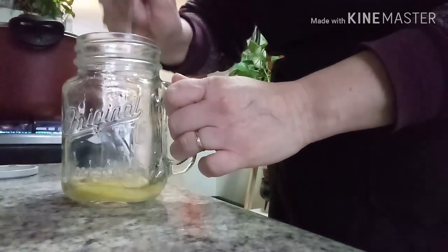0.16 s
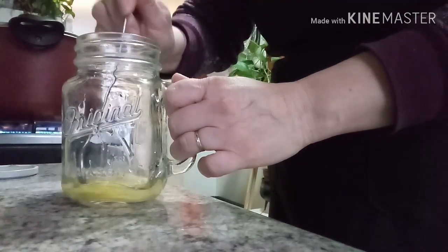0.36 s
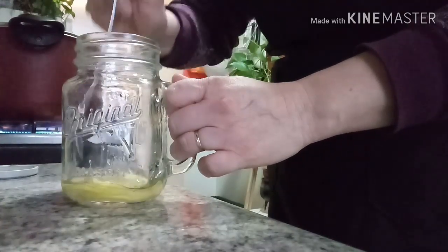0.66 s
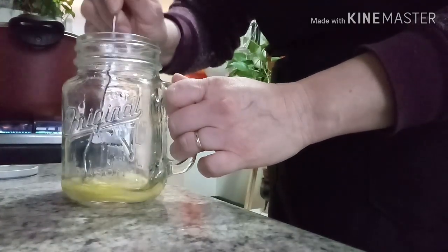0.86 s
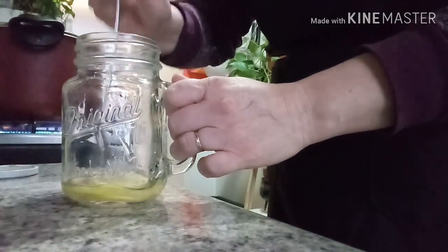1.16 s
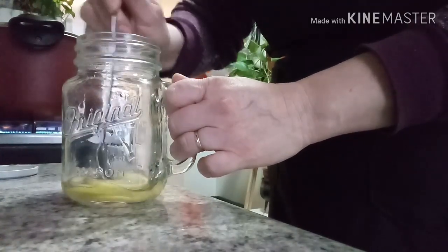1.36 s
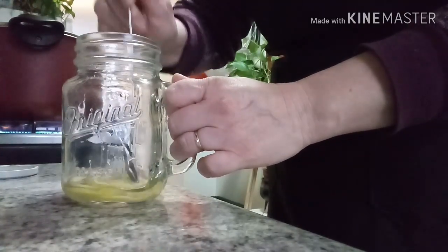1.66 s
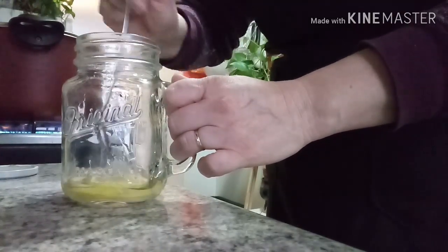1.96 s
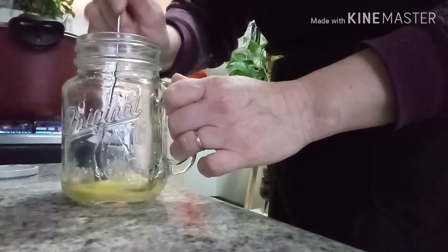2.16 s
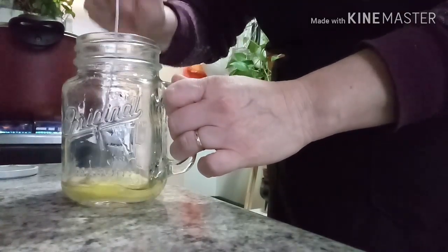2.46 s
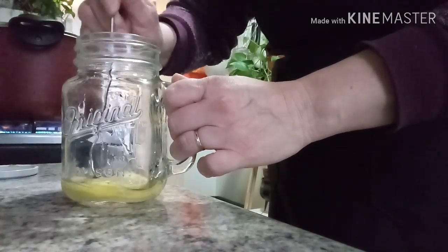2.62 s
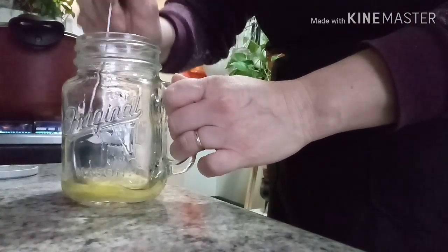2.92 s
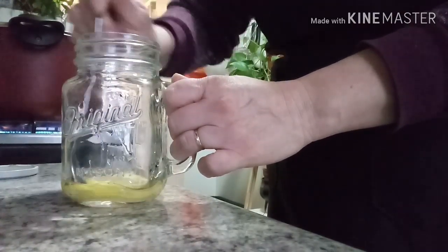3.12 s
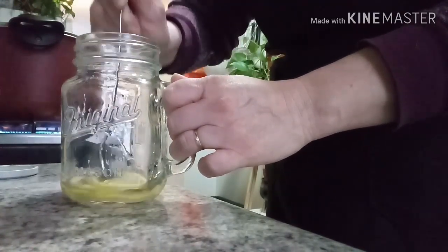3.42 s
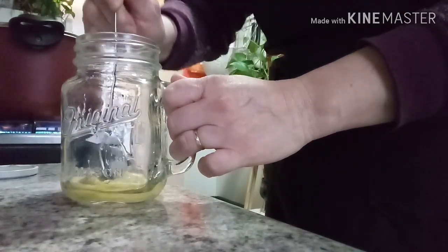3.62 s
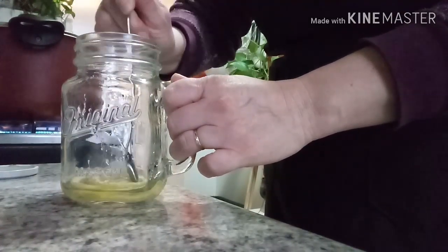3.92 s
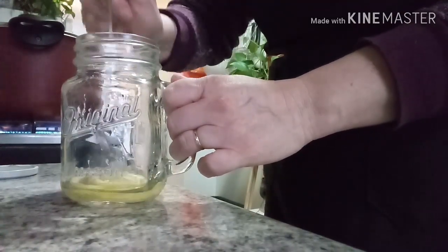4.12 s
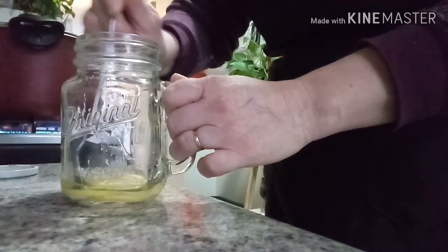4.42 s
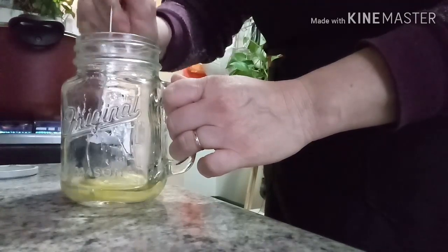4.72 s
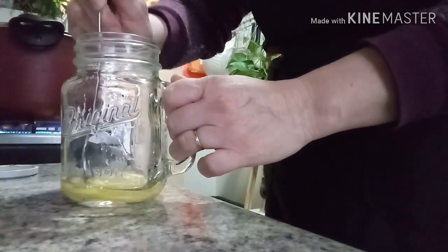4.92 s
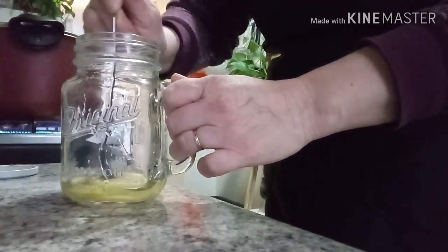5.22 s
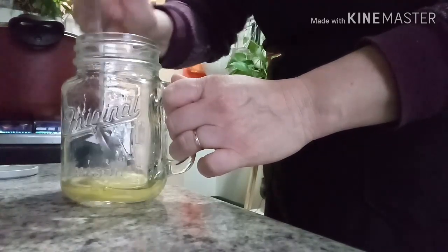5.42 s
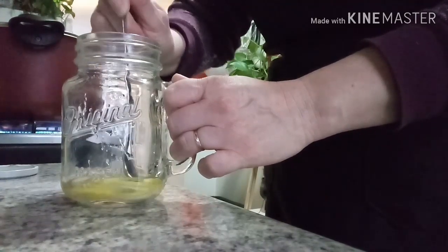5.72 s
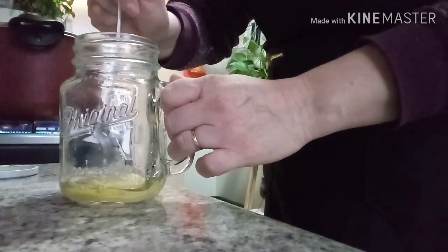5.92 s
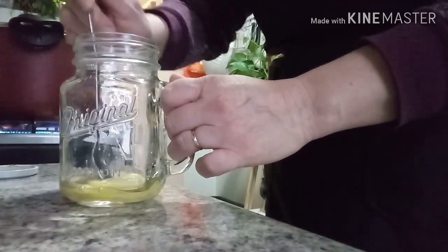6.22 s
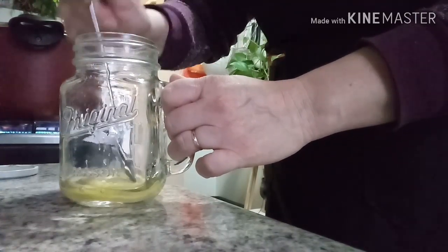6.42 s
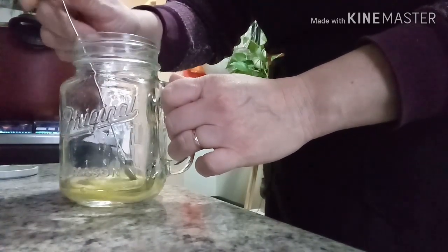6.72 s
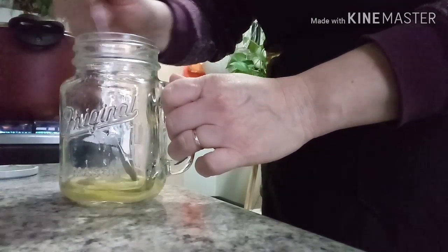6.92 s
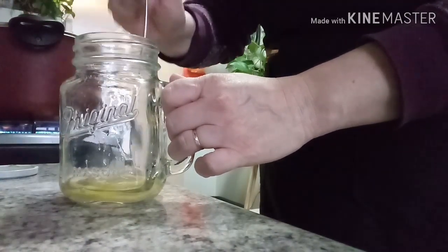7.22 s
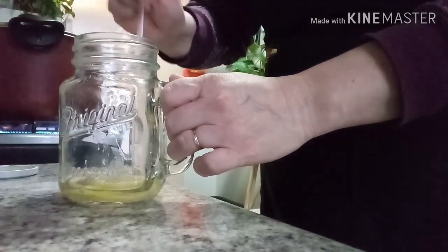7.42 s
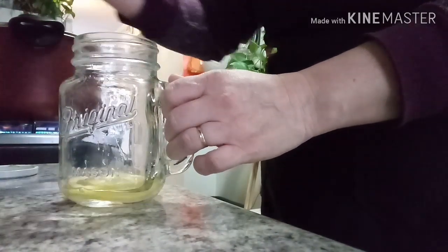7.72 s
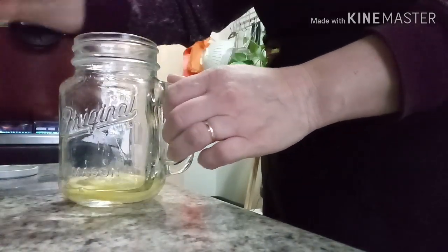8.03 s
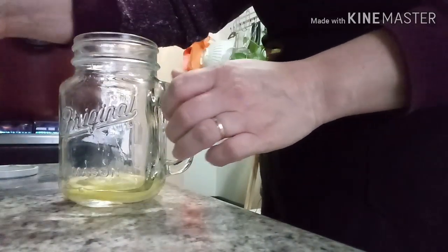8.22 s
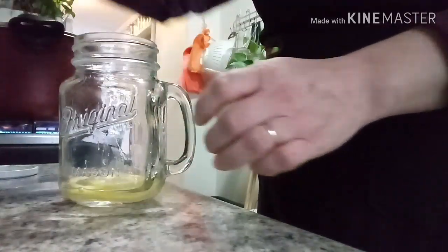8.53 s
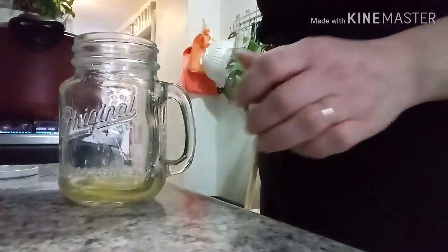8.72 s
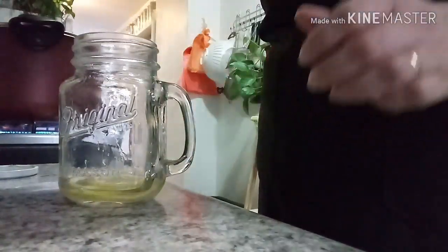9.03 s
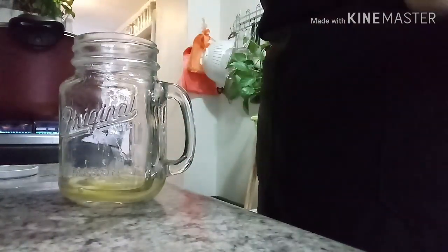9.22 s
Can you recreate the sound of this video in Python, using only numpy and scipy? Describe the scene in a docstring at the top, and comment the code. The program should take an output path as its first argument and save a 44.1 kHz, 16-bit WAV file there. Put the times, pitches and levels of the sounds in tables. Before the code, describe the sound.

Close to the microphone on a stone counter, a heavy glass mug is bumped softly as a spoon stirs a little liquid. Low thuds and dull knocks come about twice a second, with hardly any ringing at first. Near the end the spoon strikes the glass brightly, chatters on the rim, and is laid down further off with a short rustle. A faint gas burner roars and hisses behind in a small hard kitchen.

```python
"""Stirring juice in a glass jar mug

A spoon stirs a little juice in a jar mug held on a stone counter, close to a phone lying on that counter.
The jar's foot thuds (sagging sines) and knocks (counter modes, filtered grit); the spoon clinks the wall
and rim (glass modes), then is laid down further off with a rustle (patchy noise).
Behind, filtered noise makes a gas burner's roar and hiss; decaying noise is the small hard kitchen's answer."""
import sys
import numpy as np
from scipy import signal
from scipy.fft import rfft, irfft, next_fast_len
from scipy.io import wavfile
from scipy.ndimage import uniform_filter1d, map_coordinates

SR = 44100
rng = np.random.default_rng(int(sys.argv[2]) if len(sys.argv) > 2 else 0)


def waveform_to_disk(signal):
    """Save audio, clipped to [-1, 1], as 16-bit WAV at the path in sys.argv[1]."""
    frames = np.transpose(np.atleast_2d(signal))
    scaled = np.clip(frames, -1, 1) * 32767
    samples = np.round(scaled).astype(np.int16)
    wavfile.write(sys.argv[1], SR, samples)


N = 413216

# background course: (time [s], flame roar before its 4 dB lift [dB], gas hiss [dB], scrape of the jar's foot [dB])
BACKGROUND_LEVELS = [(0.0, -50.5, -65, -61), (0.6, -56, -68.5, -63.5), (1.62, -53, -69.5, -67.5),
                     (2.11, -57, -70.5, -56.5), (2.5, -54.5, -71, -68), (3.23, -55.5, -64.5, -62.5),
                     (3.7, -55.5, -70.5, -69), (4.33, -52, -76, -68), (4.7, -58, -68, -66.5),
                     (4.91, -55, -70, -67.5), (6.97, -53.5, -67, -63), (7.25, -55, -70, -61),
                     (7.49, -54, -65.5, -62.5), (8.01, -59.5, -74, -68.5), (8.35, -49.5, -62, -53),
                     (8.51, -59.5, -68, -60), (8.92, -52, -68, -65.5), (9.37, -58.5, -70.5, -70.5)]
# soft pushes of the jar on the counter: (time [s], level [dB], t60 [s], level of the rumble that follows [dB])
PUSHES = [(0.041, -38, 0.11, -45), (0.114, -22.5, 0.088, -52), (0.197, -27.5, 0.16, -53),
          (0.483, -38, 0.22, -49), (0.575, -29, 0.073, -52), (0.952, -11.5, 0.079, -47.5),
          (1.396, -14.5, 0.042, -44.5), (1.78, -42, 0.11, -45), (1.833, -25.5, 0.065, -53),
          (1.888, -30, 0.35, -57), (1.967, -24, 0.11, -56), (2.295, -15, 0.056, -38),
          (2.684, -28.5, 0.21, -52), (2.735, -22, 0.091, -60.5), (3.11, -15.5, 0.047, -47),
          (3.242, -29.5, 0.075, -60), (3.56, -40, 0.11, -51.5), (3.965, -27.5, 0.18, -45.5),
          (4.101, -39, 0.11, -58), (4.411, -28, 0.15, -45), (4.914, -26, 0.099, -44),
          (5.314, -28, .12, -40), (5.356, -28, 0.061, -54), (5.497, -29.5, 0.057, -65.5),
          (5.744, -25.5, 0.084, -43), (5.908, -33, 0.067, -48), (6.167, -35, 0.31, -45),
          (6.635, -34.5, 0.099, -55), (7.391, -13.5, 0.07, -56), (8.252, -43, 0.095, -62),
          (8.841, -47, .1, -47), (8.921, -31.5, 0.16, -61), (9.02, -55, .1, -55.5)]
# the jar's foot or the spoon meeting something hard and dull: (time [s], counter level near 500 Hz [dB],
# then relative to that: counter at 200 Hz [dB], counter at 1 kHz [dB], click [dB], snap [dB])
CONTACTS = [(0.127, -45.5, -7, -19, -10.5, -17), (0.202, -26.5, -2, -5, -5.5, -45),
            (0.534, -34, -17.5, -39, -26, -49), (0.556, -45.5, -16.5, -5.5, -13, -25),
            (0.582, -32.5, -19, -8, 3.5, -21), (0.961, -17.5, -10.5, -6, -2.5, -11),
            (1.239, -55, -3, -9, -27, -25), (1.405, -43, 2.5, -37, -37, -51.5),
            (1.888, -36, 4.5, -14, -27, -21.5), (1.971, -24, -2, -4.5, -2, -30),
            (2.285, -48.5, 13, -20, -14, -31), (2.294, -46.5, 12.5, -4, -18, -23.5),
            (2.69, -45.5, -4, -24.5, -15, -31.5), (2.714, -43, 0, -7, -32, -23),
            (2.737, -24.5, -12.5, -3, -4.5, -10.5), (3.116, -33.5, 0, -7.5, -2, -31),
            (3.245, -39.5, -19, -6, -11, -31.5), (3.255, -37, -9, -12, -8, -41),
            (4.467, -50, 1.5, -9, 6, -11), (4.509, -49.5, -18, -32.5, -23, -17),
            (4.614, -62, -7.5, -10, 2, -2.5), (4.922, -19, -10, -3.5, -1, -8.5),
            (5.764, -57, 4, -19, -25, -30), (5.911, -28, 0, -1.5, -3.5, -40),
            (6.633, -27, -1.5, -1, -0.5, -2), (6.884, -71, 1, -17, -1, -29), (7.39, -32, 10, -1, 5, -2.5),
            (7.4, -20, -0.5, -7, -13, -25), (8.22, -32.5, -12.5, -4.5, -4, -1),
            (8.23, -36, -15.5, -2, -12, -11.5), (8.329, -46, -12, 8.5, -30, -13),
            (8.367, -40, -15, -12, -29, -6)]


def amp(db):
    """dB to gain."""
    return 10 ** (np.asarray(db) / 20)


def unit(x):
    """Scaled to rms 1."""
    return x / np.sqrt(np.mean(x ** 2) + 1e-20)


def along(points, hz):
    """Reads (Hz, value) points on a log frequency axis."""
    f, v = np.transpose(points)
    return np.interp(np.log(hz + 1), np.log(f + 1), v)


def curves(rows):
    """One value per sample for each column after the time."""
    s, *columns = np.transpose(rows)
    return [np.interp(np.arange(N) / SR, s, column) for column in columns]


def filtered(x, response):
    """x times a complex response of frequency."""
    m = next_fast_len(N + SR // 2)
    return irfft(rfft(x, m) * response(np.fft.rfftfreq(m, 1 / SR)), m)[..., :N]


def resonances(modes):
    """Causal response of (Hz, width Hz, dB) resonances, summed with alternating sign."""
    def response(f):
        return sum((-1) ** k * amp(db) * 1j * f * width / (hz * hz - f * f + 1j * f * width)
                   for k, (hz, width, db) in enumerate(modes))
    return response


def shaped(spectrum):
    """Response of a (Hz, dB) spectrum."""
    return lambda hz: amp(along(spectrum, hz))


def rush(response, patchy_db):
    """Coloured noise of rms 1 whose gain wanders in thin streaks, a bin or two wide and about .1 s long."""
    z = signal.stft(rng.standard_normal(N), nperseg=512)[2]
    field = uniform_filter1d(rng.standard_normal(z.shape), size=2, axis=0)
    field = uniform_filter1d(field, size=14, axis=1)
    patchy = signal.istft(z * amp(patchy_db * unit(field)), nperseg=512)[1][:N]
    return unit(filtered(patchy, response))


def ringing(modes, gains_db, attack, drift):
    """Half a second of decaying modes that start together and wander apart in phase."""
    hz, _, t60 = np.transpose(modes)[:, :, None]
    t = np.arange(SR // 2) / SR
    steps = np.cumsum(rng.standard_normal((len(hz), 201)), axis=1)
    wander = np.array([np.interp(t, np.linspace(0, .5, 201), row - row[0]) for row in steps])
    swing = np.sin(2 * np.pi * hz * t + drift * wander)
    return np.sum(amp(gains_db[:, None] - 60 * t / t60) * swing, axis=0) * (1 - np.exp(-t / attack))


def add(track, s, sound):
    """Lays a sound on the track at time s."""
    part = track[max(round(s * SR), 0):][:len(sound)]
    part += sound[:len(part)]


def wobble(rate):
    """A smooth random curve, rate knots a second."""
    return map_coordinates(rng.standard_normal(int(N * rate / SR) + 4), [np.arange(N) * rate / SR])


def wake(times, levels_db, rise, t60):
    """Gain that swells after each contact and dies away."""
    out, t = np.zeros(N), np.arange(SR // 2) / SR
    for s, db in zip(times, levels_db):
        add(out, s, amp(db - 60 * t / t60) * (1 - np.exp(-t / rise)))
    return out


def strokes(times, lengths, levels_db, edge):
    """Gain that rises at each contact, sinks over its length and then falls nearly to nothing."""
    t = np.arange(N) / SR
    shape = [0.0032, 0.65, 0.11, 0.00067]
    return sum(amp(db) * np.interp(t, [s, s + edge, s + edge + length, s + 3 * edge + length], shape)
               for s, length, db in np.broadcast(times, lengths, levels_db))


def room_tone():
    """Steady coloured noise: the room's air and the microphone's self-noise."""
    # (frequency [Hz], relative density [dB per Hz])
    air_colour = [(410, -16.5), (700, 0.5), (876, -5), (1590, -12.5), (2100, -8.5), (2560, -15.5),
                  (3000, -12), (4640, -20), (5580, -12.5), (6370, -14), (8080, -24.5), (13500, -29),
                  (15000, -21), (15800, -26), (16500, -44.5)]
    air_db = -73.5
    return amp(air_db) * rush(shaped(air_colour), patchy_db=2.5)


def burner():
    """Gas burner behind: the flame's low resonances colour a roar, the gas jets a hiss; both are noise."""
    # the flame's resonances, before the power that steepens them: (frequency [Hz], width [Hz], level [dB])
    flame_modes = [(100, 41, -12), (129.9, 16, -4.5), (146.16, 14, -3), (181.2, 44, -13.5)]
    # gas jets: (frequency [Hz], relative density [dB per Hz])
    jet_colour = [(2240, -42.5), (3800, -16), (4120, -16), (4680, -10.5), (4790, -16), (5230, -4.5),
                  (5600, -1.5), (6360, 3), (7500, -20), (8500, -48.5), (11000, -67.5), (18700, -120)]
    # the roar drops out briefly: (time [s], change [dB])
    roar_dips = [(.4, -16), (.76, -5), (2.85, -8), (4.61, -8), (6.8, -18), (7.57, -30), (8.58, -27),
                 (9.06, -9)]
    dip_s = .035
    t = np.arange(N) / SR
    roar_db, hiss_db, _ = curves(BACKGROUND_LEVELS)
    dips_db = sum(db * np.exp(-((t - s) / dip_s) ** 2) for s, db in roar_dips)
    roar_db = roar_db + dips_db + 1.7 * wobble(6)
    roar = amp(roar_db + 4) * rush(lambda f: resonances(flame_modes)(f) ** 1.694, patchy_db=1.5)
    hiss = amp(hiss_db + 1.4 * wobble(5.5)) * rush(shaped(jet_colour), patchy_db=5.0)
    return roar + hiss


def counter_rumble():
    """Each push leaves a low rumble in the counter, noise over a faint constant floor."""
    # (frequency [Hz], relative density [dB per Hz])
    rumble_colour = [(12, -22), (25, 5), (50, 4), (80, -6), (110, -21.5), (200, -65)]
    floor_db, edge_s, hold_s = -77.5, .03, 0.14
    push_s, _, _, after_db = np.transpose(PUSHES)
    gain = amp(floor_db) + strokes(push_s, hold_s, after_db, edge_s)
    return gain * rush(shaped(rumble_colour), patchy_db=3.5)


def rubbing():
    """The jar's foot scrapes the stone and the spoon drags: noise that swells after knocks and in short rubs."""
    # the jar's foot on stone: (frequency [Hz], relative density [dB per Hz])
    scrape_colour = [(110, -53.5), (190, -12.5), (226, -10), (259, -7.5), (400, -8), (532, -19), (719, -35),
                     (855, -32.5), (932, -26), (1500, -44.5), (1950, -72), (3300, -120)]
    # what the dragged spoon excites: (frequency [Hz], width [Hz], relative level [dB])
    drag_modes = [(1007, 300, -4.5), (2282, 53, 0), (2640, 170, 2), (2930, 190, 3.5), (3355, 180, -2.5),
                  (4495, 170, -3.5), (4900, 200, -5.5)]
    # short rubs along the stone or the glass: (time [s], length [s], scrape level [dB], drag level [dB])
    rub_rows = [(0.502, 0.22, -58, -96), (1.86, 0.16, -63, -75), (3.288, .16, -64, -65),
                (4.447, 0.1, -58, -72), (4.61, 0.039, -78, -70), (6.86, 0.063, -57, -75),
                (7.498, 0.38, -62, -69.5), (8.324, 0.18, -81, -53), (8.842, 0.15, -57.5, -66.5)]
    drag_floor_db, rub_edge_s = -83, .02
    scrape_after_db, scrape_t60 = -31, 0.13  # relative to the knock; s
    drag_after_db, drag_t60 = -20.5, 0.2  # relative to the knock's click; s
    scrape_db = curves(BACKGROUND_LEVELS)[2]
    knock_s, knock_db, _, _, click_db, _ = np.transpose(CONTACTS)
    rub_s, rub_length, rub_scrape_db, rub_drag_db = np.transpose(rub_rows)

    scrape = amp(scrape_db + 2.0 * wobble(8))
    scrape += wake(knock_s, knock_db + scrape_after_db, 0.017, scrape_t60)
    scrape += strokes(rub_s, rub_length, rub_scrape_db, rub_edge_s)
    drag = amp(drag_floor_db + 2.3 * wobble(8))
    drag += wake(knock_s, knock_db + click_db + drag_after_db, 0.0062, drag_t60)
    drag += strokes(rub_s, rub_length, rub_drag_db, rub_edge_s)
    return scrape * rush(shaped(scrape_colour), patchy_db=2.5) + drag * rush(resonances(drag_modes), patchy_db=8.5)


def kitchen(x):
    """Each frequency of the room's answer dies at its own speed; a new noise tail for each quarter second."""
    # (frequency [Hz], t60 [s])
    room_decay = [(200, 0.42), (1000, 0.21), (4000, 0.32), (10000, 0.097)]
    out, step = np.zeros(N), SR // 4
    for start in range(0, N, step):
        hz, t, z = signal.stft(rng.standard_normal(SR // 2), SR, nperseg=256)
        fade = amp(-60 * t / along(room_decay, hz)[:, None])
        tail = signal.istft(z * fade, SR, nperseg=256)[1]
        answer = signal.fftconvolve(x[start:start + step], tail / np.linalg.norm(tail))
        add(out, start / SR + 0.0036, answer)  # arrives 3.6 ms late
    return out


def faint_tones():
    """Lone faint wavering sines with a soft start, scattered through the background."""
    # (time [s], level [dB], frequency [Hz], t60 [s])
    tone_rows = [(0.03, -66.5, 2040, 0.3), (0.129, -64.5, 2720, 0.62), (0.585, -53, 4900, 0.14),
                 (0.6, -64, 2710, .14), (1.651, -53, 2870, 0.15), (1.89, -62.5, 2690, .24),
                 (2.08, -62, 964, 1), (2.08, -66, 2780, 0.22), (2.534, -60, 2570, 0.25),
                 (2.82, -66, 2756, 0.39), (3.12, -43, 4930, 0.07), (3.33, -72, 2113, .5),
                 (4.0, -61, 4000, 0.17), (4.472, -62.5, 2640, .21), (4.62, -64, 4600, 0.28),
                 (4.62, -69, 3430, 0.21), (4.96, -60, 410, 1), (5.02, -60.5, 2100, 0.57),
                 (6.75, -61, 2080, .21), (7.229, -64, 2870, 0.19), (7.541, -51.5, 2890, .2),
                 (8.83, -38.5, 972, 0.056), (8.931, -61, 1184, 0.56), (8.97, -68, 4550, .36),
                 (9.0, -66, 2230, .33)]
    out = np.zeros(N)
    for s, db, hz, t60 in tone_rows:
        add(out, s, ringing([(hz, db, t60)], np.array([db]), attack=.006, drift=0.58))
    return out


def rustle():
    """The spoon is laid down: a brief patchy noise that fades, with two dry ticks as bursts of its gain."""
    # (time [s], level [dB])
    swell_rows = [(8.828, -47), (8.864, -51), (8.868, -54.5), (8.924, -51.5), (8.966, -66.5), (9.064, -66),
                  (9.15, -87)]
    # (frequency [Hz], relative density [dB per Hz])
    colour = [(470, -57.5), (800, -42), (964, -8.5), (1490, -29), (1720, -5), (1950, -38.5), (2180, 2.5),
              (2770, -2), (5780, -1.5), (9500, -38), (12400, -78.5), (20900, -120)]
    # (time [s], level before the soft attack [dB])
    tick_rows = [(8.8265, -26), (8.8707, -29)]
    t = np.arange(N) / SR
    first_s, last_s = swell_rows[0][0], swell_rows[-1][0]
    inside = np.interp(t, [first_s - .002, first_s, last_s, last_s + .01], [0, 1, 1, 0])
    swell = inside * amp(curves(swell_rows)[0])
    tick_t = t[:SR // 20]
    for s, db in tick_rows:
        add(swell, s, amp(db - 60 * tick_t / 0.0083) * (1 - np.exp(-tick_t / 0.0013)))
    return swell * rush(shaped(colour), patchy_db=2)


def thuds():
    """A soft push swells over a few ms and swings the counter for a few cycles, the pitch sagging."""
    pitch_hz, spread_hz = 92, 2.4  # each swing starts at about 1.35 times its drawn pitch and sags to 0.41 times
    rock_s, rock_db, rock_t60 = .045, -17, 0.067  # the jar rocks back once: delay s, level re the push, s
    out, t = np.zeros(N), np.arange(SR // 3) / SR
    swings = []
    for s, db, t60, _ in PUSHES:
        swings += [(s, db, t60), (s + rock_s, db + rock_db, rock_t60)]
    sag = 0.41 * t + .75 * .03 * (1 - np.exp(-t / 0.024))
    for s, db, t60 in swings:
        turns = rng.normal(pitch_hz, spread_hz) * sag + rng.random()
        swell = (1 - np.exp(-t / 0.0026)) ** 2
        add(out, s, amp(db - 60 * t / t60) * swell * np.sin(2 * np.pi * turns))
    return out


def soft_contact(f, edge):
    """A contact of finite length starves the treble above the edge [Hz]."""
    return 1 / (1 + 1j * 1.4 * f / edge - (f / edge) ** 2) ** 2


def knocks():
    """Each knock rings the counter and sends a sharp pulse with a gritty tail through the contact."""
    # (frequency [Hz], relative level [dB], t60 [s])
    counter_modes = [(174.1, 5, 0.099), (198.6, 0.5, .11), (252.7, -7.5, 0.15), (347.8, -17, 0.17),
                     (389.9, 1.5, 0.088), (508, 1, 0.075), (564, -2.5, 0.1), (656.3, -1.5, 0.092),
                     (739.6, 0, 0.071), (792.4, -8.5, 0.11), (958, -9, 0.14), (1047, 10.5, 0.019),
                     (1097, 5, 0.032), (1174, -7.5, 0.069), (1276, -17, 0.24)]
    # the contact's middle resonances: (frequency [Hz], width [Hz], level [dB])
    click_modes = [(1030, 560, -7), (1420, 330, -1.5), (1674, 330, 1.5), (2108, 420, -0.5),
                   (2370, 210, -1.5), (2760, 120, -7), (3500, 2600, -14)]
    # its upper resonances: (frequency [Hz], width [Hz], level [dB])
    snap_modes = [(4820, 280, 7), (6237, 770, 1), (7010, 880, 2.5), (7500, 330, -7), (8850, 820, -13.5),
                  (11200, 690, -23)]
    body, click, snap, t = np.zeros(N), np.zeros(N), np.zeros(N), np.arange(SR // 8) / SR
    hz, level, _ = np.transpose(counter_modes)
    for s, db, low, high, click_db, snap_db in CONTACTS:
        place = along([(270, low), (345, 0), (810, 0), (930, high)], hz)
        gains_db = level + place + rng.normal(0, 2.06, len(hz))
        rise = 0.00082 * amp(-click_db / 2)  # a contact with little click is a slow one
        add(body, s, amp(db - 3) * ringing(counter_modes, gains_db, attack=rise, drift=0.55))
        grit = rng.standard_normal((2, len(t))) * (amp(-60 * t / 0.02) + amp(-16.5 - 60 * t / 0.12))
        grit[:, [0, round(.0022 * SR)]] += [amp(15.5), -amp(15.0)]  # the blow and its first rebound
        add(click, s, amp(db + click_db + 11.5) * grit[0])
        add(snap, s, amp(db + snap_db + 10.5) * grit[1])
    body = filtered(body, lambda f: soft_contact(f, 2500))
    click = filtered(click, lambda f: resonances(click_modes)(f) * soft_contact(f, 4200) ** 2)
    snap = filtered(snap, lambda f: resonances(snap_modes)(f) * soft_contact(f, 8500))
    return body + click + snap


def clinks():
    """Spoon on glass: the place struck weights the modes; the spoon damps the first burst, the rest rings free."""
    # (time [s], level near 3.1 kHz [dB], then relative to that, set by the place struck: 3.3 kHz [dB],
    # 3.5 kHz [dB], 5.7 kHz [dB], 6.4 kHz [dB], 9 kHz [dB]; free ring relative to the first burst [dB])
    touches = [(0.03, -55, -15, -17, -8, -12, -25, -14), (1.667, -57, -11, -14, -14, -20, -26, -8),
               (2.999, -69, -17, -13, -2, -5, -18.5, 5), (3.254, -44, -32, -34, 4, 0.5, -42, -15),
               (3.337, -43.5, -25, -34, 7, 1, -36, -17), (3.52, -73, -4, 2, 17.5, 12, -10, -6.5),
               (3.998, -66, -14, -9, 6, -0.5, -23, 0), (5.999, -47.5, -22, -10, -5, -23, -39, -19),
               (6.634, -13.5, -14, -1, -5, -8, -8, -11.5), (6.652, -16, -18, -5, 1, -14, -18, -19),
               (6.687, -46, -12, -14, 12, -9.5, -27, -14), (6.904, -55, -9, -15, -1, -19, -25, -10.5),
               (6.921, -43, -20, -23, -8.5, -27, -36.5, -15),
               (7.389, -19, -5, -16, -9.5, -13.5, -29, -18.5), (7.74, -65.5, -8.5, -8, -4, -9, -16.5, -2.5),
               (8.001, -65.5, -7.5, -1, -1.5, -3.5, -18.5, 1.5), (8.222, -28, -10.5, -9, 7, -8, -25, 7.5),
               (8.23, -19, -15, -16.5, 4, -9, -15, -18), (8.249, -25, -18, -18, -12.5, -8, -18.5, -3),
               (8.258, -30, -12, -20, 6.5, -3, -21, -9.5), (8.28, -33, -20, -20, 7, -4.5, -12, -12),
               (8.302, -43, -10.5, -28, 9, -5, -18, 3.5), (8.325, -32.5, -7, -9, 14, 0, -16, -12),
               (8.334, -31, -9, -8, 11, -3, -14, -9.5), (8.337, -38, -7, -9, 16, -7, -11, -20),
               (8.346, -41, -4, -5, 16.5, -0.5, -10, -7), (8.361, -41.5, -4, 3, 19, -10, -13, -3.5),
               (8.371, -40.5, -15, -15, 1, -8, -17, -4.5), (8.557, -49, -12, -4, -3.5, -11, -26, -28)]
    # jar and spoon ringing: (frequency [Hz], relative level [dB], t60 of the free ring [s])
    glass_modes = [(2191, -24, .3), (2850, -18, .2), (3032, -11, .2), (3090, 1, .3), (3149, -8, .25),
                   (3318, 5, .41), (3372, -9, .2), (3426, -5, .18), (3488, 2, .2), (3640, -8, .18),
                   (4484, -24, .18), (4646, -22, .15), (4850, -18, .25), (5550, -10, .25), (5629, 0, .2),
                   (5710, -2, .26), (5805, -8, .25), (6180, 1, .22), (6282, -3, .22), (6495, 0, .25),
                   (6675, -5, .25), (6890, -8, .18), (7460, -14, .15), (8435, -1, .2), (8850, -14, .14),
                   (9250, -12, .1), (9650, -12, .15), (10400, -12, .15), (11320, -10, .15),
                   (14800, -18, .1)]
    crack_modes = [(3260, 900, 9), (6000, 1600, 1.5), (8890, 1800, -7.0),
                   (12370, 2500, -17.5), (15000, 1000, -26.5)]  # (frequency [Hz], width [Hz], level [dB])
    out, crack, t = np.zeros(N), np.zeros(N), np.arange(SR // 2) / SR
    hz, level, _ = np.transpose(glass_modes)
    crack_fade = (amp(-60 * t / 0.032) + amp(-17 - 60 * t / 0.2)) * (1 - np.exp(-t / .0015))
    for s, db, second, beside, third, fourth, high, free_db in touches:
        place = along([(3150, 0), (3300, second), (3380, second), (3420, beside), (3700, beside),
                       (5500, third), (5810, third), (6100, fourth), (7000, fourth), (8400, high)], hz)
        gains_db = level + place + rng.normal(0, 1.5, len(hz))
        ring = ringing(glass_modes, gains_db, attack=.0013, drift=.1)
        # a new touch takes energy from the earlier ring
        start = round(s * SR)
        out[start:][:len(t)] *= amp(-5 * (2 - np.exp(-t / 0.0011)))[:N - start]
        add(out, s, amp(db - 4) * ring * (amp(free_db) + amp(-60 * t / 0.083)))
        crack_db = db + (third + high) / 2 - 19.0
        add(crack, s, amp(crack_db) * crack_fade * rng.standard_normal(len(t)))
    return out + filtered(crack, resonances(crack_modes))


def scene():
    """Knocks and clinks with the kitchen's answer, over thuds, rustle, faint tones and background."""
    background = room_tone() + burner() + counter_rumble() + rubbing()
    dull, bright = knocks(), clinks()
    wet = kitchen(amp(-11.5) * dull + amp(-8.0) * bright)
    return (dull + bright + wet + thuds() + rustle() + faint_tones() + background)[None]


def record(dry):
    """The phone keeps nothing above its band limit."""
    top_hz = 16600
    return filtered(dry, lambda hz: hz < top_hz)


dry = scene()
out = record(dry)
waveform_to_disk(out)
```